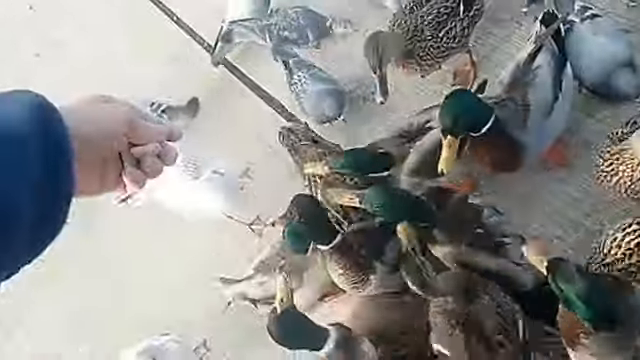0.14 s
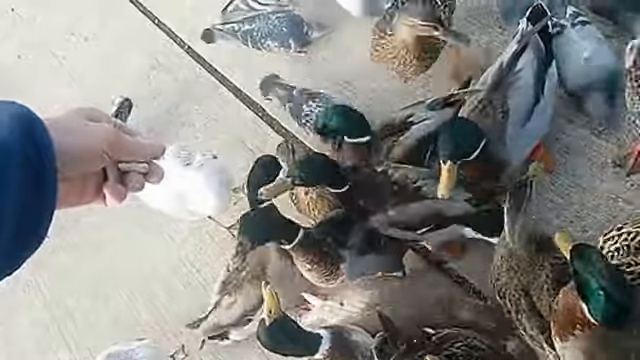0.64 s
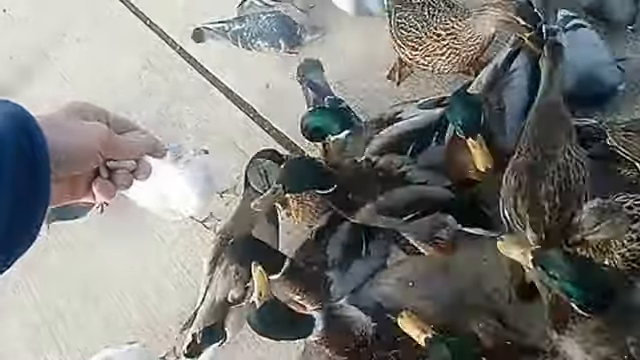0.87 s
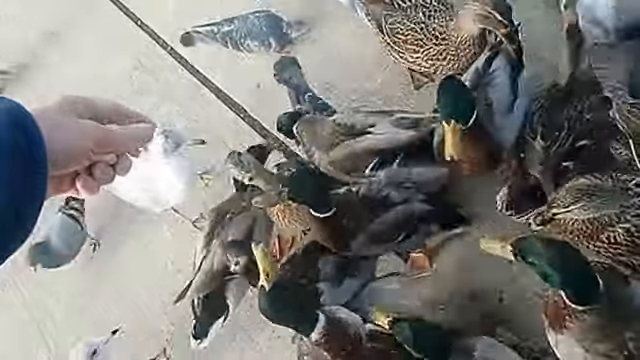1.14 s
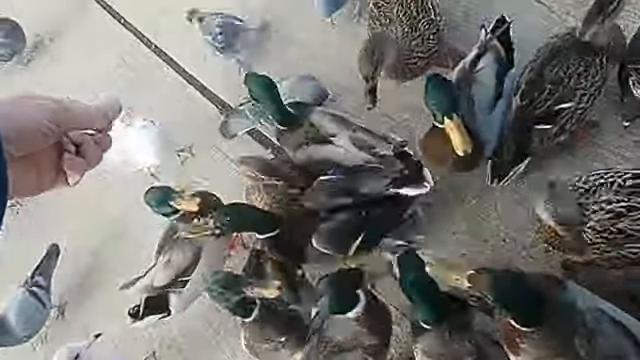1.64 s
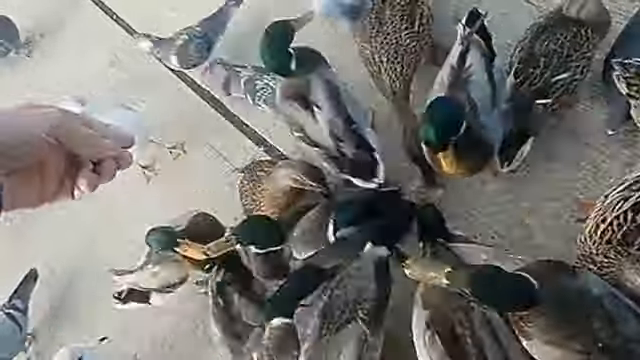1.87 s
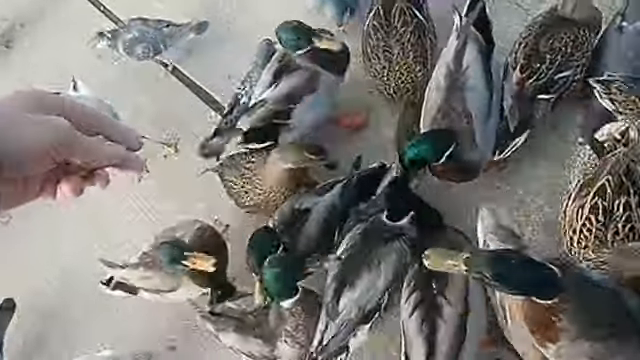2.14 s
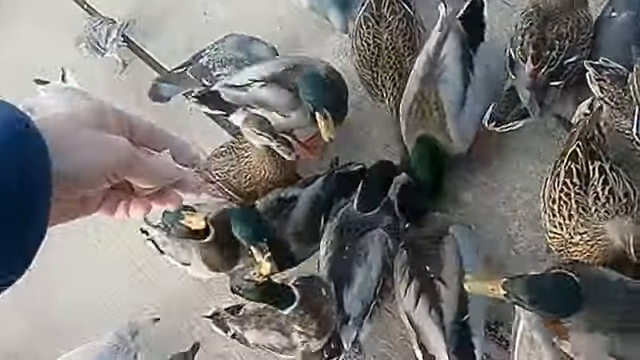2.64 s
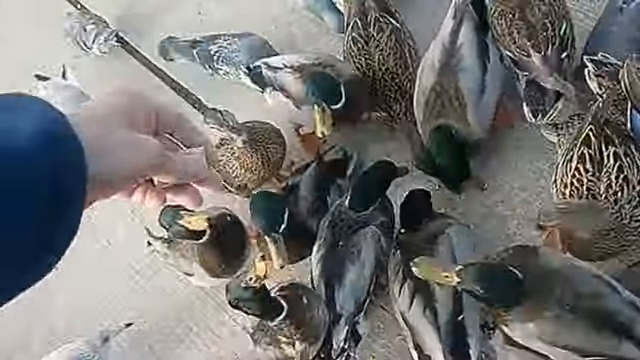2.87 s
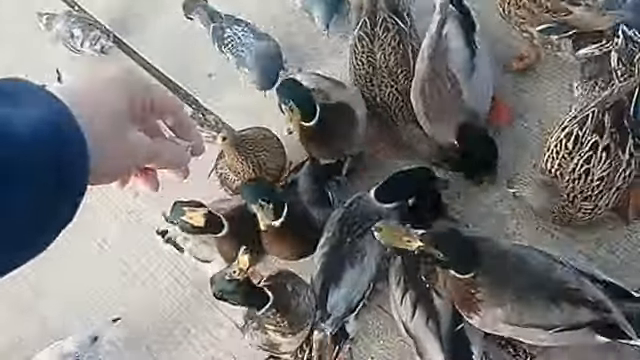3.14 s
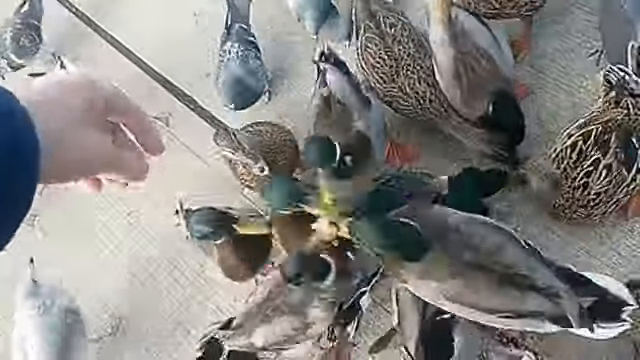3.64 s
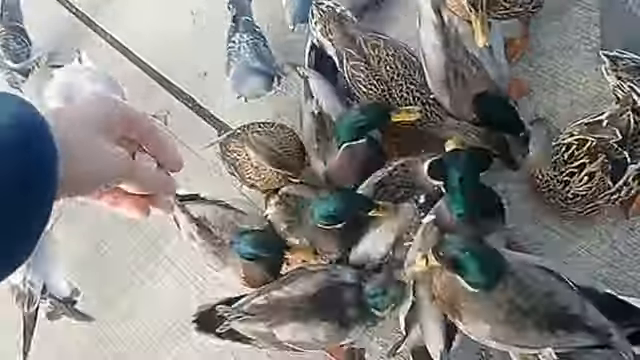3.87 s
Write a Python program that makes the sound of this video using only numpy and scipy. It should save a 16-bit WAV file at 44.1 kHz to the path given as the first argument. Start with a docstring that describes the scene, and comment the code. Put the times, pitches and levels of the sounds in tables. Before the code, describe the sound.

Raspy duck quacks on concrete, with piercing gull whistles, small scuffles and a faint low rumble

```python
"""Ducks, pigeons and gulls crowd over thrown food on concrete, a metre below a phone with one microphone; 4 s.
Throughout: filtered-noise rustle, town rumble (sinking over the first 2 s) and hum; patter of noise grains.
From 0 s ducks quack (pulsed, ringing throats); soft noise bumps at 0.07 and 0.63 s; gull whistles (gliding
sines) at 0.15 and 1.4 s; a grain scratch at 0.8 s, then a thin squeal; short notes from 0.7 s. From 2.7 s
a yelp and one hoarse call, a scratch at 3 s, then whistles, squeals, notes and quacks crowd together to the end."""
import sys
import numpy as np
from scipy import signal
from scipy.fft import rfft, irfft
from scipy.io import wavfile
from scipy.ndimage import uniform_filter1d, map_coordinates

SR = 44100
rng = np.random.default_rng(int(sys.argv[2]) if len(sys.argv) > 2 else 0)


def amplitude_ratio(level_db):
    """Convert a level in decibels to the matching linear amplitude (field) ratio."""
    exponent = np.asarray(level_db, float) / 20
    return 10 ** exponent


def output_pcm(signal):
    """Save a mono or channel-first signal as 16-bit PCM at the path in sys.argv[1].

    Samples are clipped to [-1, 1] before scaling.
    """
    pcm = np.clip(np.atleast_2d(signal).T, -1, 1) * 32767
    wavfile.write(sys.argv[1], SR, np.round(pcm).astype(np.int16))


N = 176400

# Town rumble spectrum. Each row: frequency in Hz, relative level in dB per Hz.
TOWN_SPECTRUM = [(25,-22),(150,-2),(900,-44.5)]
# Town rumble level. Each row: time in seconds, level in dB.
TOWN_LEVEL = [(0, -36.5), (2, -41.5)]
# Hum lines. Each row: frequency in Hz, level in dB.
HUM_LINES = [(147,-51.5),(177,-42.5)]
# Flock rustle spectrum. Each row: frequency in Hz, relative level in dB per Hz.
RUSTLE_SPECTRUM = [(300,1),(1500,-6),(13300,-15),(16500,-32)]
# Soft bumps near the microphone. Each row: start in seconds, length in seconds, peak level in dB, centre in Hz.
BUMPS = [(0.066, 0.058, -19.5, 159), (0.632, 0.035, -24.5, 120)]
# Bills and claws on concrete. Each row: start in seconds, length in seconds, peak level in dB.
SCRATCHES = [(0.794,0.13,-25.5),(2.982,0.029,-18.5)]
# Duck quacks. Each row: start in seconds, level in dB, first throat resonance in Hz, mean pulse rate in Hz.
QUACKS = [(.001,-30.5,1620,315),(0.333,-26.5,1590,267),(0.679,-30.5,1600,243),(0.788,-22.5,1056,246.3),(0.831,-26,1350,265.4),(0.975,-21.5,1510,813),
          (1.086,-25,1240,215.8),(1.361,-30,1650,169.3),(1.541,-25,1540,188.7),(1.875,-22,916,237),(2.1,-31,1610,110.7),
          (2.397,-19.5,826,274),(2.446,-27.5,765,306),(2.922,-18.5,1726,833),(3.094,-19.5,1680,274.4),
          (3.219,-24,1790,294.2),(3.336,-27.5,1620,257.3),(3.452,-32,2060,131),(3.511,-23.5,2760,330),(3.566,-15.5,2000,150.5)]
# Throat resonances. Each row: ratio to the first, bandwidth over first resonance, level in dB.
THROAT = [(1, .28, 5), (1.5, .16, 0), (1.97, .16, -1), (2.8, 1, -4)]
# Short notes, peeps and grunts. Each row: start in seconds, length in seconds, from Hz, to Hz, level in dB.
CHIRPS = [(0.683,0.016,1490,1280,-27),(1,0.062,2095,1400,-32),
          (1.273,0.03,373,352,-23),(1.535,0.061,310,316,-21.5),
          (2.592,0.064,2010,1326,-33),(2.741,.13,2220,1764,-36.5),(3.417,0.017,5000,4240,-17),
          (3.606,0.024,3110,3200,-14.5),(3.607,0.023,1700,1750,-18),(3.624,0.019,3100,3400,-11.5),
          (3.862,0.026,4700,4230,-23.5)]
# Gull voices. Each holds: number of the tracked partial, list of levels of partials 1, 2, .. in dB.
WHISTLE_VOICE = 1, [0, -21, -26]
SQUEAL_VOICE = 2, [-19, 0, -9]
YELP_VOICE = 1, [0, -5, -9]
HOARSE_VOICE = 2, [-12.5, -5, 0]
# Gull calls, one curve each. Each row of a curve: time in seconds, tracked partial in Hz, level in dB.
WHISTLES = [
    [(.147,4730,-20),(.165,4506,-9),(.205,4430,-20.5),(.21,5170,-10.5),(.288,5145,-17.5),(.302,5355,-23.5),(.34,5213,-18.5),(.434,5020,-20.5),(.438,4400,-26),(.46,3940,-41)],
    [(1.412,4480,-28),(1.43,4428,-8),(1.459,4380,-12),(1.463,5143,-7),(1.538,5016,-15.5),(1.55,5230,-22),(1.64,5085,-18.5),(1.66,5023,-11),(1.925,5020,-18)],
    [(3.126,4465,-7.5),(3.172,4157,-14.5),(3.178,5180,-17.5),(3.192,4924,-9.5),(3.243,4840,-15)],
    [(3.638,4080,-12),(3.66,4660,-6.5),(3.678,4800,-30)],
    [(3.645,4380,-23),(3.71,4270,-12),(3.735,4460,-28)],
    [(3.72,5030,-19),(3.752,5176,-8.5),(3.785,5500,-27.5),(3.88,4680,-19.5),(3.95,4580,-28.5)],
]
SQUEALS = [
    [(.82,3400,-36.5),(1.06,3556,-35.5),(1.68,3297,-38.5)],
    [(3.245,5960,-37),(3.42,5790,-29.5)],
    [(3.64,3230,-31),(3.89,3810,-36)],
    [(3.678,5730,-24.5),(3.88,5830,-38)],
]
YELPS = [
    [(2.682,2247,-28),(2.742,2174,-14.5)],
    [(3.535,1936,-23),(3.578,1925,-23)],
]
# One hoarse gull call, then the fainter raspy band beside it. Each row of a curve: as for the calls above,
# time in seconds, tracked partial in Hz, level in dB.
HOARSE_CALL_BANDS = [
    [(2.735,3455,-29),(3.3,3344,-35)],
    [(2.77,3010,-40.5),(2.98,3086,-35.5)],
]

RUSTLE_HISS_DB, RUSTLE_FLICKER_DB = -41, 2.2  # hiss level before the octave split
SCRATCH_CENTRE_HZ, SCRATCH_GRAINS_PER_S, GRAIN_SPREAD_DB = 9000, 900, 2.5
QUACK_PULSES, QUACK_MIN_S = 10.48, .034
PULSE_JITTER_RATIO, QUACK_SAG_RATIO = .11, .2
PULSE_SPREAD_DB, BREATH_DB, CHEST_DB = 4.28, -5, -7.5
EDGE_S = 0.0019
TREMBLE_RATIO, HOARSE_TREMBLE_RATIO = 0.0047, .016  # pitch
TREMBLE_DB, SQUEAL_TREMBLE_DB, YELP_THROB_DB, HOARSE_TREMBLE_DB = 2.14, 4.28, 6, 5


def unit(x):
    """Scales to rms 1."""
    return x / np.sqrt(np.mean(x ** 2) + 1e-18)


def band(x, centre_hz, width_hz, order=1):
    """Band-pass about a geometric centre; upper edge capped at 0.45 SR."""
    low_hz = np.sqrt(centre_hz ** 2 + width_hz ** 2 / 4) - width_hz / 2
    high_hz = min(low_hz + width_hz, .45 * SR)
    sos = signal.butter(order, [low_hz, high_hz], "bandpass", fs=SR, output="sos")
    return signal.sosfilt(sos, x)


def coloured(points):
    """Noise of rms 1 whose spectrum follows (Hz, dB) points on a log-frequency axis."""
    hz = np.arange(N // 2 + 1) * SR / N + 1  # +1 avoids log(0)
    p = np.array(points)
    gain_db = np.interp(np.log(hz), np.log(p[:, 0]), p[:, 1])
    return unit(irfft(rfft(rng.standard_normal(N)) * amplitude_ratio(gain_db), N))


def walk(changes_per_s, size=N):
    """Slewed random levels, spread near 1."""
    hold = max(int(SR / changes_per_s), 2)
    steps = np.repeat(rng.standard_normal(size // hold + 1), hold)
    smooth = uniform_filter1d(uniform_filter1d(steps, hold), hold)
    return 1.2 * smooth[:size]


def add(out, x, start_s):
    """Mixes x into out in place, cut at the end of out."""
    i = max(int(start_s * SR), 0)
    out[i:i + len(x)] += x[:len(out) - i]


def town_rumble():
    """Low coloured noise at a slowly changing level."""
    t = np.arange(N) / SR
    level_db = np.interp(t, *np.array(TOWN_LEVEL).T)
    return coloured(TOWN_SPECTRUM) * amplitude_ratio(level_db)


def hum():
    """Wavering lines: noise through 4 Hz wide bands."""
    return sum(amplitude_ratio(db) * unit(band(rng.standard_normal(N), hz, 4)) for hz, db in HUM_LINES)


def flock_rustle():
    """Coloured hiss split into six octaves, each flickering on its own."""
    hiss = coloured(RUSTLE_SPECTRUM)
    out = np.zeros(N)
    for hz in 400 * 2 ** np.arange(6):
        level_db = RUSTLE_HISS_DB + RUSTLE_FLICKER_DB * walk(15)
        out += band(hiss, hz, 0.85 * hz) * amplitude_ratio(level_db)
    return out


def grit(grains_per_s, centre_hz):
    """Random grains of mixed size, each a short decaying noise tail, in a broad band; rms 1."""
    struck = rng.random(N) < grains_per_s / SR
    hits = struck * amplitude_ratio(GRAIN_SPREAD_DB * rng.exponential(size=N))
    decay = np.exp(-1 / (0.0012 * SR))  # power falls by e in 1.2 ms
    tail = np.sqrt(signal.lfilter([1], [1, -decay], hits ** 2))
    return unit(band(tail * rng.standard_normal(N), centre_hz, 3.7 * centre_hz))


def patter():
    """Stray patter of feet: sparse faint grains."""
    return amplitude_ratio(-43) * grit(200, 3600)


def bumps():
    """Soft bumps: swelling bursts of low band noise."""
    out = np.zeros(N)
    for start_s, length_s, db, hz in BUMPS:
        n = int(length_s * SR)
        thud = unit(band(rng.standard_normal(n), hz, 0.46 * hz))
        add(out, amplitude_ratio(db) * np.hanning(n) * thud, start_s)
    return out


def scratches():
    """Bills and claws scrape the concrete: dense bright grains that swell and fade."""
    out = np.zeros(N)
    scrape = grit(SCRATCH_GRAINS_PER_S, SCRATCH_CENTRE_HZ)
    for start_s, length_s, db in SCRATCHES:
        i, n = int(start_s * SR), int(length_s * SR)
        swell = np.sin(np.pi * np.linspace(0, 1, n))
        add(out, amplitude_ratio(db) * swell * scrape[i:i + n], start_s)
    return out


def throat(drive, first_hz):
    """Resonances of alternating sign ring to the drive; rms 1."""
    out = np.zeros(len(drive))
    for k, (ratio, width, db) in enumerate(THROAT):
        ring = band(drive, first_hz * ratio, first_hz * width, order=2)
        out += (-1) ** k * amplitude_ratio(db) * unit(ring)
    return unit(out)


def ducks():
    """Uneven pulses and puffs of air ring the throat; the pulse rate also sounds as a chest tone."""
    out = np.zeros(N)
    for start_s, db, throat_hz, pulse_hz in QUACKS:
        n = int(max(QUACK_PULSES / pulse_hz, QUACK_MIN_S) * SR)
        u = np.linspace(0, 1, n)
        cycle = np.cumsum(pulse_hz * (1 + PULSE_JITTER_RATIO * walk(200, size=n))) / SR
        puffs = np.exp(-(cycle % 1) / 2.7) * rng.standard_normal(n)  # weakens within each cycle
        pulses = np.diff(np.floor(cycle), prepend=0) * amplitude_ratio(PULSE_SPREAD_DB * rng.standard_normal(n))
        drive = unit(pulses) + amplitude_ratio(BREATH_DB) * unit(puffs)
        chest = amplitude_ratio(CHEST_DB) * np.sin(2 * np.pi * cycle)
        voice = throat(drive, throat_hz) + chest
        # pitch and throat sag together
        read_at = np.cumsum(1 - QUACK_SAG_RATIO * (u - .5))
        voice = map_coordinates(voice, [read_at], mode="nearest")
        add(out, amplitude_ratio(db) * np.sin(np.pi * u) * voice, start_s)
    return out


def call(out, curve, voice, tremble_ratio, tremble_db, changes_per_s):
    """One curve: sine partials on a pitch line that trembles in pitch and, partial by partial, in level."""
    c = np.array(curve, float)
    tracked, partials_db = voice
    t = np.arange(c[0, 0], c[-1, 0], 1 / SR)
    n = len(t)
    hz = np.interp(t, c[:, 0], c[:, 1]) * (1 + tremble_ratio * walk(changes_per_s, size=n))
    phase = 2 * np.pi * np.cumsum(hz) / SR
    edge = np.clip(np.minimum(t - t[0], t[-1] - t) / EDGE_S, 0, 1)
    tone = np.zeros(n)
    for k, db in enumerate(partials_db):
        level = amplitude_ratio(db + tremble_db * walk(changes_per_s, size=n))
        tone += level * np.sin((k + 1) / tracked * phase)
    level = np.sqrt(2) * amplitude_ratio(np.interp(t, c[:, 0], c[:, 2]))  # dB are rms
    add(out, edge * level * tone, c[0, 0])


def chirps():
    """Short sine notes swell and fade while the pitch glides unsteadily, fast at first."""
    out = np.zeros(N)
    for start_s, length_s, from_hz, to_hz, db in CHIRPS:
        note = np.zeros(int(length_s * SR))
        middle_hz = to_hz + 0.38 * (from_hz - to_hz)
        curve = [(0, from_hz, db), (length_s / 2, middle_hz, db), (length_s, to_hz, db)]
        call(note, curve, WHISTLE_VOICE, HOARSE_TREMBLE_RATIO, TREMBLE_DB, 157)
        add(out, np.sqrt(np.hanning(len(note))) * note, start_s)
    return out


def gulls():
    """Clean whistles and squeals, throbbing yelps and one hoarse call, with a fainter raspy band beside it."""
    out = np.zeros(N)
    for curve in WHISTLES:
        call(out, curve, WHISTLE_VOICE, TREMBLE_RATIO, TREMBLE_DB, 60)
    for curve in SQUEALS:
        call(out, curve, SQUEAL_VOICE, TREMBLE_RATIO, SQUEAL_TREMBLE_DB, 40)
    for curve in YELPS:
        call(out, curve, YELP_VOICE, TREMBLE_RATIO, YELP_THROB_DB, 200)
    for curve in HOARSE_CALL_BANDS:
        call(out, curve, HOARSE_VOICE, HOARSE_TREMBLE_RATIO, HOARSE_TREMBLE_DB, 500)
    return out


def scene():
    """One microphone hears everything; both channels carry nearly the same sound."""
    background = town_rumble() + hum() + flock_rustle()
    jostle = patter() + bumps() + scratches()
    mono = background + jostle + ducks() + chirps() + gulls()
    side = amplitude_ratio(-30.5) * walk(300) * mono
    return np.array([mono + side, mono - side])


def low_pass(x):
    """Removes everything above the highest recorded frequency."""
    return signal.sosfilt(signal.butter(12, 16730, fs=SR, output="sos"), x)


def record(dry):
    """The phone stores the finished mix."""
    return low_pass(dry)


dry = scene()
out = record(dry)
output_pcm(out)
```